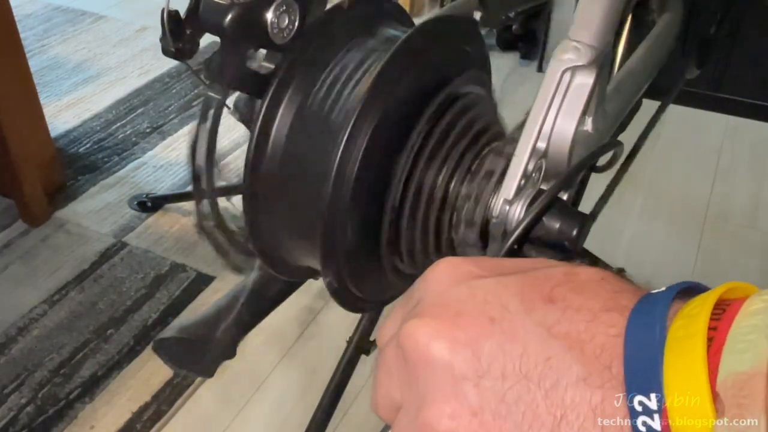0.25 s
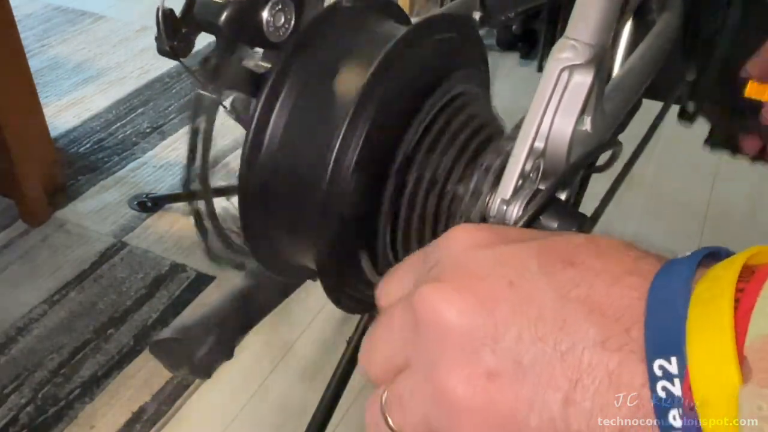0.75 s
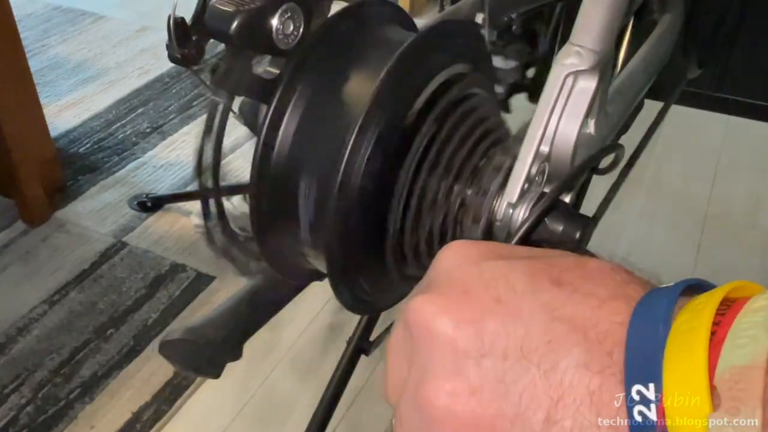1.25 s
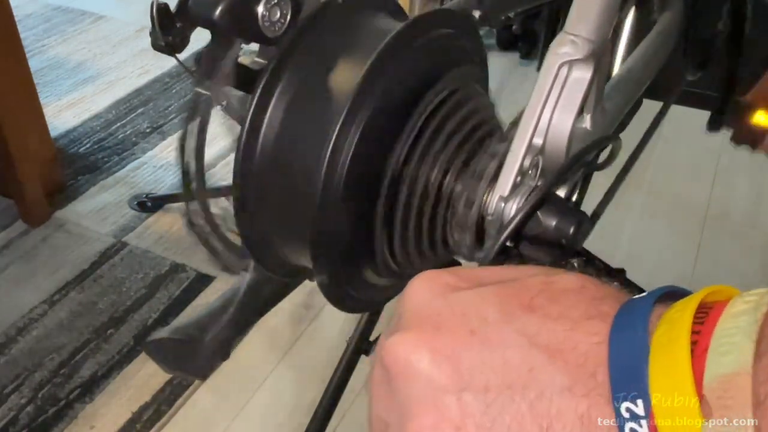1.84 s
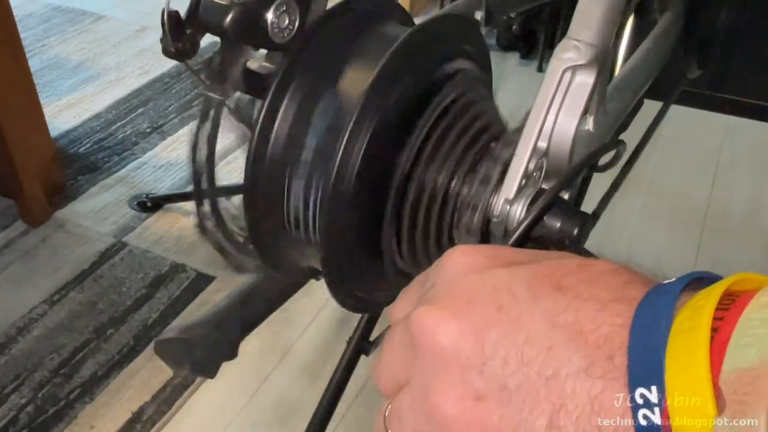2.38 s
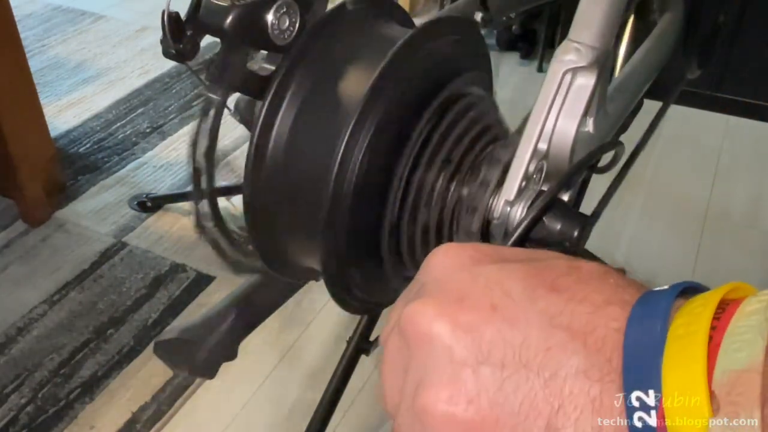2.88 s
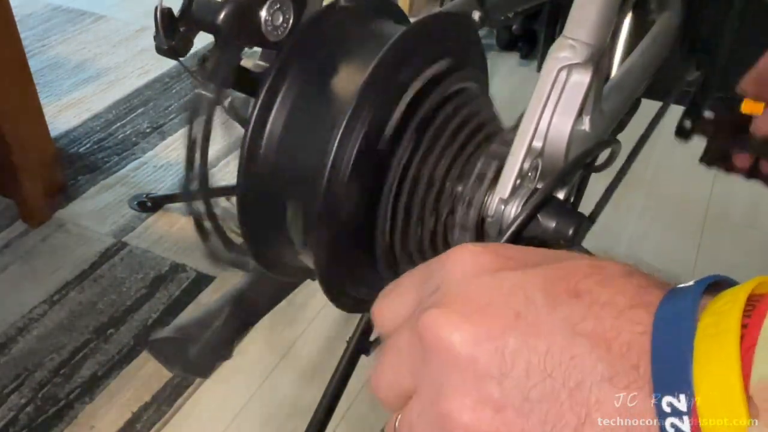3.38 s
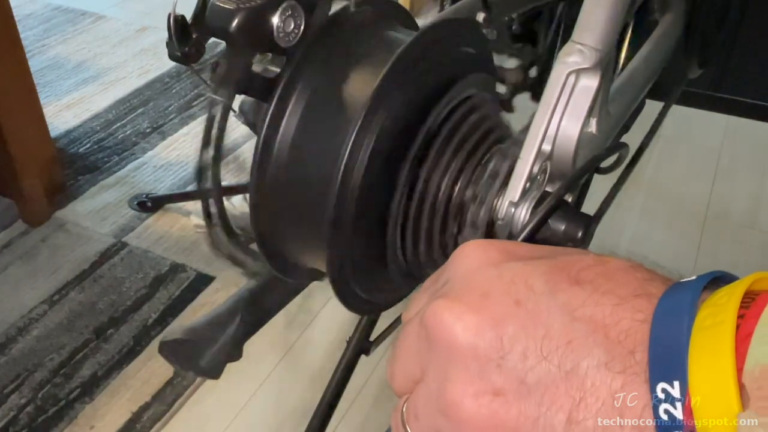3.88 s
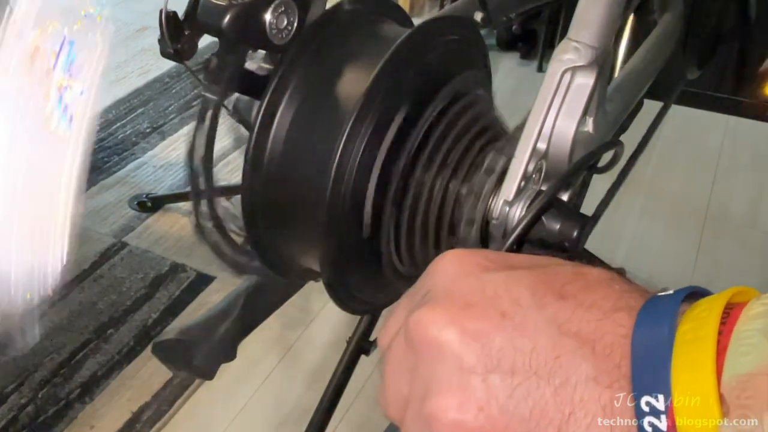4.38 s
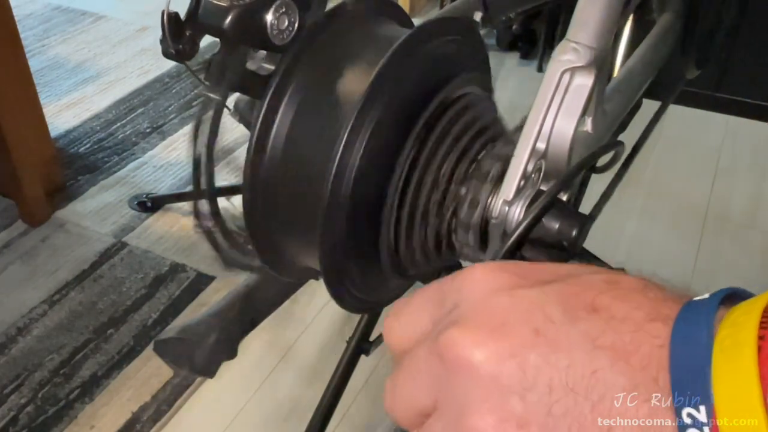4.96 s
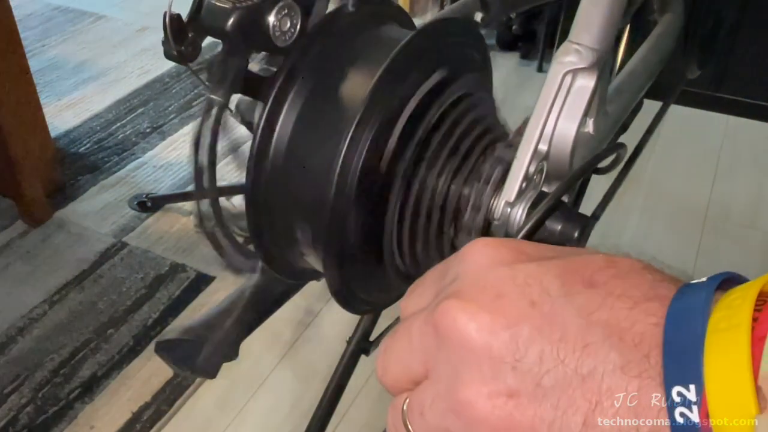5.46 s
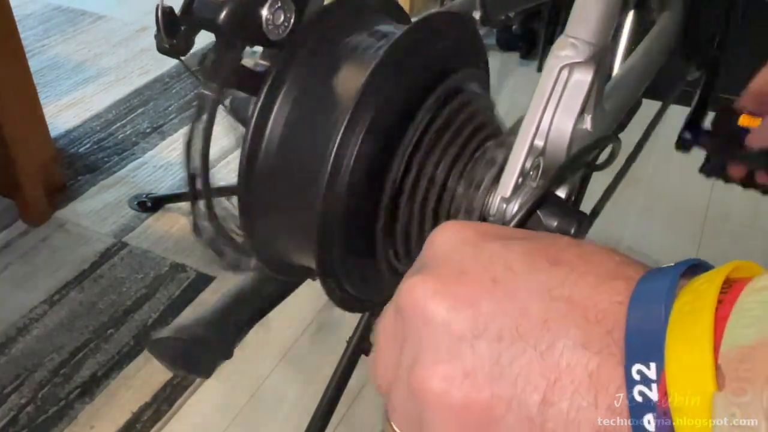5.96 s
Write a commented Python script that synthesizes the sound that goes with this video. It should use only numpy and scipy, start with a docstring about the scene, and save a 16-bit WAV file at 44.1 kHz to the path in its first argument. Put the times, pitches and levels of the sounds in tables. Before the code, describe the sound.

Close stereo sound of a bicycle wheel turning in a stand in a small workshop. From 0 seconds a quiet, surging low drone lies under frame murmur, very faint wavering hum and airy chain whirr. Over it chain rollers seat on sprocket teeth about forty times a second: dry, bright, tiny ticks, slightly uneven, with random sharper clicks and a light knock near 0.3. From 0 to 2.8 it stays a busy, light clicking. Harder snaps jump out around 2.9, 3.3, 3.6 and 3.8. After 4.3 the chain catches roughly every 0.2 seconds, often a small click just before a loud steely clack, with hollow frame ring, slack-chain rattle and brief shudder. A small adjuster click falls near 4.95, partly masked. The strongest clacks come around 5.2, 5.6 and 5.9, another at 6.1, and running continues to the end at 6.2.

```python
"""From the start a wheel drones in its stand by forced vibration, over frame murmur, two hum tones and chain whirr.
Rollers seat on the rear sprocket's teeth about forty times a second: struck resonators, with louder catches.
A few early knocks make frame and hub shell ring; after four seconds, as the adjuster turns, the chain catches on
the next sprocket about twice a turn, broadly ever harder, and the adjuster clicks once near five seconds.
The workshop answers with a diffuse tail, and two microphone ports close by turn arrival into phase and level."""
import sys
import numpy as np
from scipy import signal
from scipy.fft import rfft, irfft, next_fast_len
from scipy.io import wavfile
from scipy.ndimage import uniform_filter1d, map_coordinates

SR = 44100
rng = np.random.default_rng(int(sys.argv[2]) if len(sys.argv) > 2 else 0)


def store_pcm(level_fs):
    """Save levels as 16-bit WAV."""
    pcm = np.round(np.clip(level_fs, -1, 1) * 32767).astype(np.int16)
    wavfile.write(sys.argv[1], SR, np.atleast_2d(pcm).T)


def undo_db(level):
    """Turn decibels back into plain size, where 20 dB means ten times bigger."""
    steps = np.asarray(level, float) / 20
    return 10 ** steps


N = 274302

# levels of the running gear: start_s, murmur_db, whirr_db, lower_hum_db
RUNNING_LEVELS = [(0, -56, -56.5, -65), (.3, -56.5, -61, -72), (.85, -57, -58.5, -72),
                  (.97, -56, -58.5, -74), (1.4, -56.5, -60, -69), (1.7, -58, -60, -70),
                  (1.95, -55, -58, -78), (2.13, -55.5, -57.5, -64), (2.35, -55.5, -59, -66),
                  (2.8, -55, -57, -61), (3.0, -52.5, -56.5, -63.5), (3.3, -52, -55, -71),
                  (3.65, -56.5, -57.5, -73), (3.85, -54.5, -57.5, -79), (4.35, -53, -56, -67),
                  (4.75, -53, -57.5, -70), (5.5, -53.5, -59.5, -64.5), (6.22, -50.5, -54, -76)]
# blows passed to frame and hub shell: start_s, frame_db, then above frame_db: thud_db, push_db, upper_tubes_db
KNOCK_EVENTS = [(0.322, -48, -14, -2, 2), (0.958, -57, -19, 22, 0), (2.941, -48.5, -10, 4, -0.5),
                (3.618, -51, -9, -6, 2), (3.813, -47, -15, -6, 1), (4.31, -51.5, -6.5, -13, -1),
                (4.483, -49.5, -13, -8, 2), (4.686, -38.5, -8.5, 13, 9), (4.856, -39, -21, 5, -11),
                (5.058, -37.5, -21, 9, -2), (5.237, -33.5, -13, 3, 4), (5.399, -38, -11, -6, -3.5),
                (5.586, -34.5, -11.5, 0, 1.5), (5.755, -46.5, -36, 9, 3), (5.944, -34.5, -15, 4, 2.5),
                (6.121, -35.5, -10, 13, 1)]
# resonances of the frame tubes: centre_hz, width_hz, level_db
FRAME_MODES = [(472, 105, -3), (572, 27.5, 3), (663.7, 46.6, -0.5), (799, 94, -4), (997, 230, -8)]
# resonances of the hub shell: centre_hz, width_hz, level_db
SHELL_MODES = [(135, 45, -13), (178, 19.5, 2.5), (265, 66, -2.5), (339.3, 27.4, 5)]


def unit(x):
    """Normalization by signal power: scale to rms 1."""
    return x / np.sqrt(np.mean(x ** 2) + 1e-20)


def along(points, hz):
    """Interpolation on a logarithmic frequency axis through points (Hz, value)."""
    f, v = np.transpose(points)
    return np.interp(np.log(hz + 1), np.log(f + 1), v)


def over_time(start_s, values):
    """Linear interpolation of a slow control curve at every sample."""
    return np.interp(np.arange(N) / SR, start_s, values)


def wobble(rate):
    """Band-limited random modulation: a smooth curve through rate random knots a second."""
    knots = rng.standard_normal(int(N * rate / SR) + 4)
    return map_coordinates(knots, [np.arange(N) * rate / SR])


def filtered(x, response):
    """Linear filtering: multiplication of the spectrum by a complex response of frequency."""
    n = x.shape[-1]
    m = next_fast_len(n + SR // 2)
    return irfft(rfft(x, m) * response(np.fft.rfftfreq(m, 1 / SR)), m)[..., :n]


def body(modes):
    """Modal superposition: a causal sum of damped resonances of alternating sign."""
    def response(f):
        return sum((-1) ** k * undo_db(db) * 1j * f * w / (c * c - f * f + 1j * f * w)
                   for k, (c, w, db) in enumerate(modes))
    return response


def pair(length, response):
    """Partial coherence: stereo noise of rms 1 from independent mid and side parts."""
    # likeness of left and right: frequency_hz, correlation (0-1)
    coherence = [(60, 0.89), (290, 0.84), (640, 0.22), (1400, 0.28), (4000, 0.08), (7000, 0.18), (8600, 1),
                 (11000, 0.73), (15000, 1)]

    def mid_side(hz):
        angle = np.arccos(np.clip(along(coherence, hz), 0, 1)) / 2
        return response(hz) * [np.cos(angle), np.sin(angle)]

    mid, side = filtered(rng.standard_normal((2, length)), mid_side)
    return unit(np.array([mid + side, mid - side]))


def blows(times, level_db):
    """Impulsive excitation: one single-sample push at each time."""
    return np.bincount(np.round(times * SR).astype(int), undo_db(level_db), N)[:N]


def bursts(times, level_db, t60, snap_db):
    """Exponential decay: dying noise bursts, one a contact, each led by a millisecond snap."""
    t = np.arange(SR // 25) / SR
    shape = undo_db(-60 * t / np.reshape(t60, (-1, 1))) + undo_db(snap_db - 60 * t / 0.0018)
    shape *= 1 - np.exp(-t / 0.00023)  # oiled steel meets a little softly
    # a rattle is a cluster of uneven micro-contacts, each 12 samples long and scattered by 5 dB
    grit_db = 5 * rng.standard_normal((len(times), len(t) // 12))
    grit = np.repeat(undo_db(grit_db), 12, axis=1)
    rows = shape * grit * rng.standard_normal((len(times), len(t)))
    energy_gain = undo_db(level_db) * np.linalg.norm(shape, axis=1) / np.linalg.norm(rows, axis=1)
    rows = rows * energy_gain[:, None]
    at = np.round(times * SR).astype(int)[:, None] + np.arange(len(t))
    return np.bincount(at.ravel(), rows.ravel(), N + SR)[:N]


def steadied(x, share):
    """Forced vibration wavers less than free noise: part of its own swell is divided out."""
    swell = np.abs(signal.hilbert(x.mean(axis=0), next_fast_len(N))[:N])
    smooth = uniform_filter1d(swell, size=1500)
    return unit(x / (smooth + .15) ** np.clip(share, 0, 1))


def drone():
    """Forced vibration: wheel unbalance drives the low resonances of the stand."""
    # the drone surges and sinks: start_s, level_db
    surges = [(0.0, -56), (0.17, -58), (0.87, -58), (0.99, -48.5), (1.11, -57), (1.16, -47), (1.28, -65),
              (1.32, -51), (1.35, -59), (1.61, -54.5), (1.97, -60), (2.15, -51.5), (2.25, -61), (2.29, -52),
              (2.34, -58), (2.72, -54.5), (2.93, -60), (2.96, -48), (3.12, -55), (3.13, -48), (3.27, -55.5),
              (3.45, -48.5), (3.48, -62), (3.52, -54.5), (3.65, -60), (3.88, -51), (4.3, -54), (4.33, -49),
              (4.85, -53), (4.87, -45.5), (5.01, -57), (5.02, -50), (5.11, -47.5), (5.15, -57), (5.26, -44),
              (5.37, -61), (5.42, -49), (5.51, -60), (5.63, -48), (5.67, -63), (5.78, -46.5), (5.87, -58),
              (5.96, -52), (6.22, -49.5)]
    # resonances of the stand: centre_hz, width_hz, level_db
    stand_modes = [(56.7, 5.9, -1.5), (85.3, 14.6, -4.5)]
    return undo_db(over_time(*np.transpose(surges))) * steadied(pair(N, body(stand_modes)), share=0.5)


def murmur(shake):
    """Random vibration of frame and hub shell; independent powers of steady murmur and shudder add."""
    start_s, murmur_db, _, _ = np.transpose(RUNNING_LEVELS)
    level_db = over_time(start_s, murmur_db) + 1.85 * wobble(15) + 1.9 * wobble(40)
    return np.hypot(undo_db(level_db), shake) * pair(N, body(SHELL_MODES + FRAME_MODES))


def hum():
    """Frequency modulation: two thin drive tones whose pitch and strength waver a little."""
    # the upper tone: start_s, level_db
    upper_levels = [(0, -78), (.4, -69), (.88, -78), (1.1, -69), (2.03, -83), (2.7, -75), (2.95, -61),
                    (3.15, -67), (3.28, -68.5), (3.5, -68), (3.9, -79), (6.22, -85)]
    start_s, _, _, lower_db = np.transpose(RUNNING_LEVELS)
    levels = over_time(start_s, lower_db), over_time(*np.transpose(upper_levels))
    out = np.zeros(N)
    for pitch_hz, waver_hz, level_db in zip((577, 669), (5, 4), levels):
        strength = undo_db(level_db + 1.5 * wobble(5.94))
        phase = 2 * np.pi * np.cumsum(pitch_hz + waver_hz * wobble(9)) / SR
        out += np.sqrt(2) * strength * np.sin(phase)
    return out


def whirr(rattle):
    """Amplitude modulation breaks the chain's broadband noise into restless grains."""
    # spectrum shape: frequency_hz, relative_level_db (per Hz)
    whirr_spectrum = [(900, -8), (1300, -2.5), (2500, 4.5), (5000, 4), (8000, 2.5), (11500, -3.5),
                      (13500, -4.5), (15200, 3.5), (16200, -66)]
    start_s, _, whirr_db, _ = np.transpose(RUNNING_LEVELS)
    restless = undo_db(2.05 * wobble(60) + 4.4 * wobble(300))
    grains = unit(restless * pair(N, lambda hz: undo_db(along(whirr_spectrum, hz))))
    return np.hypot(undo_db(over_time(start_s, whirr_db)), rattle) * grains


def air():
    """Stationary random noise: the room's air, weighted toward low frequencies."""
    # spectrum shape: frequency_hz, relative_level_db (per Hz)
    air_spectrum = [(15, -49), (25, 12), (75, -6.5), (136, -9), (344, -12), (501, -11.5), (575, -13.5),
                    (882, -57), (1500, -14.5), (1950, -33), (3300, -120)]
    return undo_db(-55.0) * pair(N, lambda hz: undo_db(along(air_spectrum, hz)))


def seats():
    """Periodic impact: a roller seats on every passing tooth, each tooth with its own wear."""
    # chain travel: start_s, teeth_passed
    travel = [(0, -.3), (.478, 17.84), (.957, 36.09), (1.435, 54.54), (1.914, 72.77), (2.392, 91.63),
              (2.871, 110.65), (3.349, 129.95), (3.828, 149.34), (4.306, 168.5), (4.785, 187.91),
              (5.263, 207.2), (5.742, 226.06), (6.22, 244.86)]
    # fourteen worn teeth in turn: early_ms, sprocket_db, then above sprocket_db: plates_db, links_db
    worn_teeth = [(2, -46.5, 8, -8.5), (2.6, -43.5, 2.5, -4.5), (2, -45, 6.5, -8), (2, -41, 2.5, -19),
                  (1.7, -44.5, 3, -8), (2.9, -42.5, 0, -17), (4.3, -43.5, 3, -14), (5.6, -43.5, 5, -5),
                  (4, -41, 3.5, -4), (5.1, -40.5, 1, -9.5), (3, -40, 2.5, -8.5), (3, -43, 6, -7),
                  (6, -45, 6, -17), (10, -42.5, 1.5, -8.5)]
    # added firmness of seating: start_s, level_db
    firmness = [(0, -3.5), (1.5, -3.1), (3, -4), (4.5, -3), (6.22, 0)]
    start_s, teeth = np.transpose(travel)
    count = np.arange(1, int(teeth[-1]))
    early_ms, db, plate_db, link_db = np.transpose(worn_teeth)[:, count % len(worn_teeth)]
    luck = rng.standard_normal((len(count), 5))
    when = np.interp(count, teeth, start_s) + (.5 * luck[:, 0] - early_ms) / 1000
    db = db + np.interp(when, *np.transpose(firmness)) + luck[:, 1]
    t60 = 0.034 * np.exp(0.093 * luck[:, 4])
    return [when, db, plate_db + 1.1 * luck[:, 2], link_db + 0.3 * luck[:, 3], t60]


def faint_ticks():
    """Random point process: jockey wheels and slack links tick faintly at scattered times."""
    draw = rng.random(size=(1200, 5))
    when = draw[:, 0] * N / SR
    db = -55 + 9 * draw[:, 1] ** 3
    return [when, db, -8 + 11 * draw[:, 2], -12 + 14 * draw[:, 3], 0.0032 + 0.0047 * draw[:, 4]]


def slaps():
    """Decaying repeated impact: uneven slaps of slack chain, strong in links, follow every knock."""
    s, db = np.transpose(KNOCK_EVENTS)[:2, :, None]
    draw = rng.random(size=(len(KNOCK_EVENTS), 22, 4))
    late = .008 + .13 * draw[..., 0] ** 1.5  # s
    level_db = db - 3.5 - 60 * late / 0.51 - 14 * draw[..., 1] ** 0.49
    when = np.minimum(s + late, (N - 1) / SR)
    plate_db, link_db = -4 + 6 * draw[..., 2], 6 * draw[..., 3]
    return np.reshape([when, level_db, plate_db, link_db, 0.0031 + 0 * late], (5, -1))


def contacts(s, db, plate_db, link_db, t60):
    """Modal excitation: blow and brief rattle ring sprocket, plates and links; where they land colours them."""
    # resonances of the sprocket: centre_hz, width_hz, level_db
    sprocket_modes = [(7650, 1310, -7), (10050, 670, -3.5), (10430, 580, -2.5), (11150, 1380, -4.5),
                      (12630, 480, -3.5), (13360, 650, -5), (13500, 930, -15), (15200, 400, -5),
                      (16100, 690, -19)]
    # resonances of the side plates: centre_hz, width_hz, level_db
    plate_modes = [(4600, 2070, -12), (5250, 380, -7), (6280, 306, -4), (7330, 240, -3.5)]
    # resonances of the links: centre_hz, width_hz, level_db
    link_modes = [(1450, 700, -9), (2014, 490, -1), (2437, 540, -3.5), (2960, 290, -1.5),
                  (3600, 1070, -8.5)]

    def varied(modes):
        # each spot on the steel shifts a mode's pitch by about 2 % and its level by about 1.2 dB
        shift = np.exp(.02 * rng.standard_normal((len(modes), 1)) * [1, 0, 0])
        scatter = 1.2 * rng.standard_normal((len(modes), 1)) * [0, 0, 1]
        return body(np.array(modes) * shift + scatter)

    spots, out = 9, np.zeros((2, N))
    for spot in range(spots):
        s1, db1, plate, link, t1 = (v[spot::spots] for v in (s, db, db + plate_db, db + link_db, t60))
        bright = filtered(bursts(s1, db1 + 10.0, t1, snap_db=2.0), varied(sprocket_modes))
        plate_hit = bursts(s1, plate + 5.7, 0.92 * t1, snap_db=-17.0) + blows(s1, plate + 12.4)
        middle = filtered(plate_hit, varied(plate_modes))
        link_hit = bursts(s1, link + 6.0, 2.28 * t1, snap_db=-9.0) + blows(s1, link + 18)
        dull = filtered(link_hit, varied(link_modes))
        # every spot leans right, by 0.65 to 3.25 dB
        lean = undo_db(1.3 * (spot % 3 - 2.5) * np.array([[.5], [-.5]]))
        out += lean * (bright + middle + dull)
    return out


def clicks():
    """Superposition of all chain contacts: loud catches, seating rollers, faint ticks and slaps."""
    # loud catches and snaps: start_s, sprocket_db, then above sprocket_db: plates_db, links_db; sprocket_t60_s
    catches = [(0.02, -37, -15, -23, 0.01), (0.1563, -35, -11, -17, 0.0066), (0.172, -40, 3, -19, 0.01),
               (0.211, -34, -3, -26, 0.0067), (0.324, -41, 1, -13, 0.025), (0.341, -43, -7, -10, .006),
               (.365, -36.5, 4, -14, 0.012), (0.5258, -38, -9, -25, .006), (.577, -32, -8, -27, .006),
               (0.538, -34, -9, -20, .006), (.7395, -40, -6, -18, .008), (0.9265, -43, -9, -15, 0.0055),
               (1.0935, -39, -10, -11, .006), (0.6615, -37.5, 5.5, -5.5, 0.014),
               (0.7232, -33.5, -4, -9.5, .006), (.9057, -38, -3, -14, .008), (1.031, -36, -8, -20, 0.009),
               (0.8843, -40, -4, -15, .008), (1.1026, -48.5, 10, 9, 0.027), (1.115, -57, 1, 10, 0.026),
               (0.981, -41, 7, -1, 0.012), (1.238, -38.5, 10, -7, 0.011), (1.2603, -34, -8, -10, 0.0072),
               (1.426, -39, -4, -26, .008), (1.443, -33.5, -11, -25, .006), (1.525, -36, -8, -18, .008),
               (1.579, -37, -2, -15, .01), (1.759, -42, -5, -12, 0.0092), (1.991, -38, -5, -12, .008),
               (2.652, -39, -5, -12, .008), (1.619, -35, 0, -8, 0.0068), (1.6046, -35.5, 7, -9, 0.011),
               (1.68, -37.5, -6, -7, .01), (1.6438, -34, -11, -9, 0.0096), (1.802, -37, -10, -16, 0.0067),
               (1.967, -44, -4, -17, .014), (1.9805, -34.5, -3, -11, 0.0065), (2.071, -37, -19, -23, .017),
               (2.23, -34, -8, -7.5, 0.015), (2.273, -36, 4, -18, 0.011), (2.3231, -35, -4, -15, 0.011),
               (2.3974, -39, -14, -15, .01), (2.4229, -38, -11, -17, 0.0096), (2.3475, -37, 5, -7, 0.013),
               (2.5792, -35.5, 7, -7, 0.019), (2.676, -38, 3, -26, .011), (2.695, -37, -5, -23, .014),
               (2.9212, -38, -8, -2, 0.0091), (3.026, -41, -6, -15, 0.0092), (3.3717, -44, -14, -9, .01),
               (2.9378, -25.5, -3, -17, 0.0083), (3.003, -35, -9, -6, 0.011), (3.122, -30, 5, -5.5, 0.022),
               (3.265, -37, -16, -5, 0.007), (3.2842, -20.5, 0, -9.5, 0.0076), (3.475, -42, 9, 4, .014),
               (3.6295, -22, 2, -12, 0.0078), (3.647, -38, -3, -10, .008), (3.769, -39, -3, -8, .008),
               (3.798, -38, -3, 0, .008), (3.342, -38, -5, -10, .008), (3.8125, -26, -1, -8.5, 0.016),
               (3.96, -40.5, 5, -3, .019), (3.978, -30.5, -4, -8.5, 0.021), (4.1467, -41, -11, 1, 0.012),
               (4.1604, -30.5, 4.5, -4, 0.016), (4.284, -52, -5, 6, .006), (4.293, -42, 2, -12, .008),
               (4.415, -40, 0, -8, .006), (4.745, -37, -12, -15, .006), (5.28, -48, -5, 4, .006),
               (5.432, -50, -5, 10, .008), (4.3078, -23.5, -17, -5.5, 0.011),
               (4.3268, -26.5, 6, -12, 0.015), (4.343, -39, -13, -3, 0.045), (4.392, -40, -15, -2, .014),
               (4.483, -22.5, -13, -8.5, 0.013), (4.4923, -20.5, -5, -10, 0.021),
               (4.5194, -33, 12, -2, 0.011), (4.655, -23.5, -1.5, -7, 0.013), (4.6832, -16.5, 3, -7, 0.012),
               (4.838, -27, 2, -11, 0.015), (4.853, -16.5, 1, -11.5, 0.013), (4.926, -40, -8, -2, 0.013),
               (4.9539, -26.5, 4, -15.5, 0.03), (4.871, -46, -3, -5, .02), (5.091, -56, -7, -4, 0.019),
               (5.031, -26, 1, -7, 0.013), (5.056, -22.5, -0.5, -4, 0.01), (5.193, -38, -8, -10, 0.012),
               (5.202, -21, -5, -13, 0.018), (5.2302, -18.5, 1, -3.5, .01), (5.233, -12, 5, -12, 0.011),
               (5.2345, -13.5, 2, -21.5, 0.014), (5.2348, -18.5, 3, -14, 0.0096),
               (5.546, -38, -12, -15, .008), (5.582, -26, -7, 1, 0.011), (5.374, -32.5, -2, 1, 0.019),
               (5.3976, -29, -2, -18, 0.013), (5.555, -24, -13, -14, 0.017),
               (5.584, -16.5, 10.5, -10.5, 0.018), (5.5877, -14, 5.5, -16, 0.011),
               (5.7325, -30, -5, -2.5, 0.015), (5.756, -19.5, 3.5, -11, 0.012),
               (5.793, -44.5, -8, 6.5, 0.018), (5.8211, -35, -8, -21, .009), (5.9114, -23, 2, -11, 0.013),
               (5.9396, -12, -11, -12, 0.013), (5.9435, -12.5, 3, -8.5, 0.01), (6.06, -36, -11, -4, .013),
               (6.089, -23, -7, -11, 0.018), (6.118, -19.5, 0.5, -10.5, 0.018)]
    return contacts(*np.hstack([np.transpose(catches), seats(), faint_ticks(), slaps()]))


def workshop(x):
    """Diffuse reverberation: exponentially decaying noise, a new tail for every quarter second."""
    # decay of the room: frequency_hz, t60_s
    wall_decay = [(200, 0.1), (1000, 0.49), (3000, 0.26), (6000, 0.13), (12000, 0.11), (16000, 0.14)]
    out, step = np.zeros((2, N + SR)), SR // 4
    for start in range(0, N, step):
        hz, t, z = signal.stft(pair(SR // 2, np.ones_like), SR, nperseg=256)
        decay = undo_db(-60 * t / along(wall_decay, hz)[:, None])
        tail = signal.istft(z * decay, SR, nperseg=256)[1]
        wet = signal.fftconvolve(x[None, start:start + step], tail / np.linalg.norm(tail[0]), axes=1)
        out[:, start:start + wet.shape[1]] += wet
    return out[:, :N]


def knocks():
    """Impact response: a hard catch rings sprocket and frame, thuds the hub shell and dully pushes the wheel."""
    # dull push of the whole wheel: centre_hz, width_hz, level_db
    push_mode = [(230, 210, 0)]
    # narrow ring of the big sprocket: centre_hz, width_hz, level_db
    ring_modes = [(9850, 55, -11), (12250, 50, 1)]
    s, db, thud_db, push_db, upper_db = np.transpose(KNOCK_EVENTS)

    def jolt(level_db):
        return blows(s, level_db + 40.5) + bursts(s, level_db + 4, .025, snap_db=-5.0)

    lower_tubes = filtered(jolt(db), body(FRAME_MODES[:2]))
    upper_tubes = filtered(jolt(db + upper_db), body(FRAME_MODES[2:]))
    # the shell answers a moment late
    thud = filtered(blows(s + 0.00625, db + thud_db + 52.5), body(SHELL_MODES))
    push = filtered(blows(s + 0.00092, db + push_db + 32.5), lambda hz: body(push_mode)(hz) ** 2)
    ring = filtered(blows(s, db + 30), body(ring_modes))
    return lower_tubes + upper_tubes + thud + push + ring


def shudders():
    """Transient decay: after a knock the bicycle shudders in its stand, adding gain to murmur and whirr."""
    # rows for murmur and whirr: above_knock_db, rise_s (time constant), t60_s
    shudder_decay = [(-4, 0.011, 0.22), (-15, 0.032, 0.67)]
    s, db = np.transpose(KNOCK_EVENTS)[:2]
    t = np.arange(SR // 2) / SR
    gains = []
    for above_db, rise, t60 in shudder_decay:
        envelope = undo_db(-60 * t / t60) * (1 - np.exp(-t / rise))
        gains.append(signal.fftconvolve(blows(s, db + above_db), envelope)[:N])
    return gains


def adjuster():
    """Free vibration: the barrel drops into its notch and rings briefly."""
    # clicks of the adjuster: start_s, blow_db
    notch_clicks = [(4.9541, 3)]
    # resonances of the barrel: centre_hz, width_hz, level_db
    barrel_modes = [(2780, 81, -0.5), (3120, 76, -1.5)]
    s, db = np.transpose(notch_clicks)
    return filtered(blows(s, db), body(barrel_modes))


def scene():
    """Superposition of direct contacts, their room answer, the running gear and the room's air."""
    shake, rattle = shudders()
    running = drone() + murmur(shake) + hum() + whirr(rattle)
    tick, knock = clicks() + adjuster(), knocks()
    room = workshop(undo_db(-6.0) * tick.mean(axis=0) + undo_db(-3) * knock)
    return tick + knock + room + running + air()


def roll_off(x):
    """The treble ends steeply here."""
    return signal.sosfilt(signal.butter(12, 16950, fs=SR, output="sos"), x)


def record(dry):
    """Interaural-like differences: two ports a little apart turn phase and lean level; band edges are steep."""
    # level between the ports: frequency_hz, left_over_right_db
    port_lean = [(60, 3.5), (110, 5), (200, 0), (400, -0.5), (1300, .8), (4400, 2.8), (9000, 2)]
    # phase between the ports: frequency_hz, left_lead_rad
    port_phase = [(600, 0), (1900, -.1), (3600, 1.6), (5000, .3), (6300, -1.5), (7700, -2.8), (8600, -3.14),
                  (9650, -3.5), (12100, -5.5), (13400, -6.25), (16500, -6.4)]
    side = np.array([[.5], [-.5]])

    def response(hz):
        edges = hz ** 6 / (hz ** 6 + 44 ** 6) / (1 + (hz / 15800) ** 70)
        return edges * undo_db(side * along(port_lean, hz)) * np.exp(1j * side * along(port_phase, hz))

    ports = filtered(dry, response)
    return roll_off(ports)


dry = scene()
out = record(dry)
store_pcm(out)
```